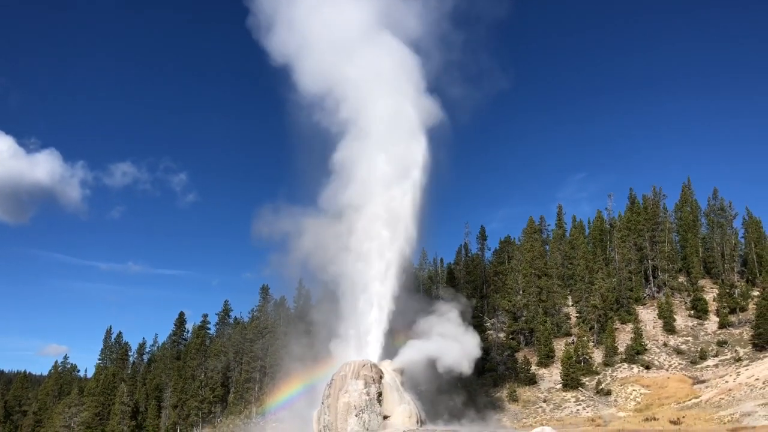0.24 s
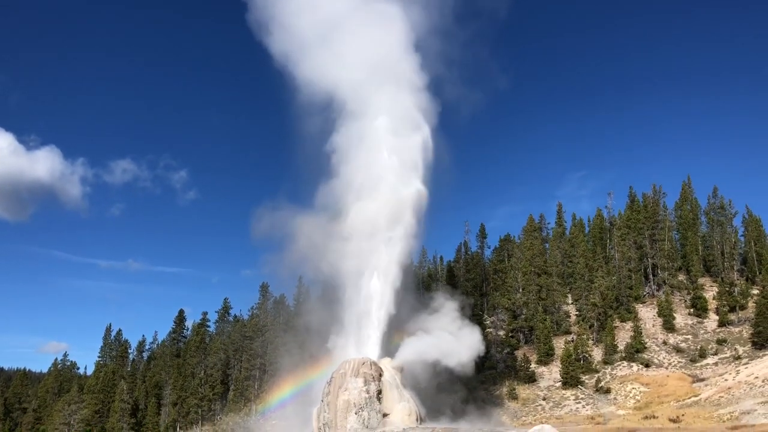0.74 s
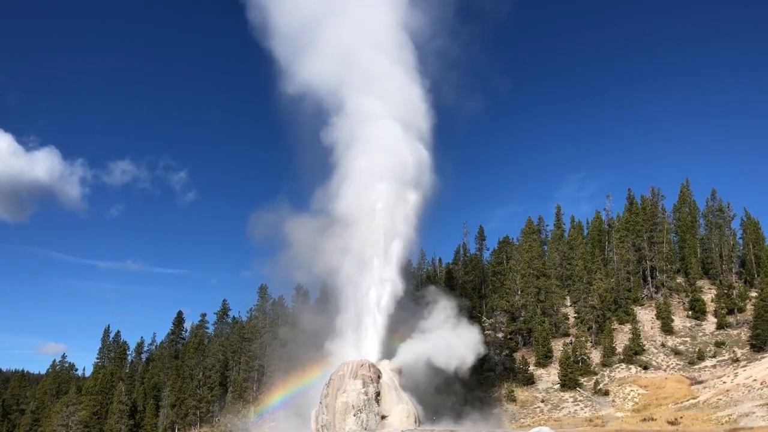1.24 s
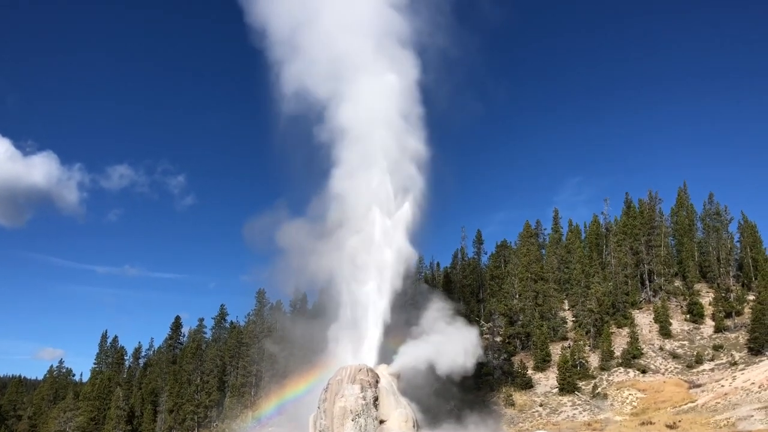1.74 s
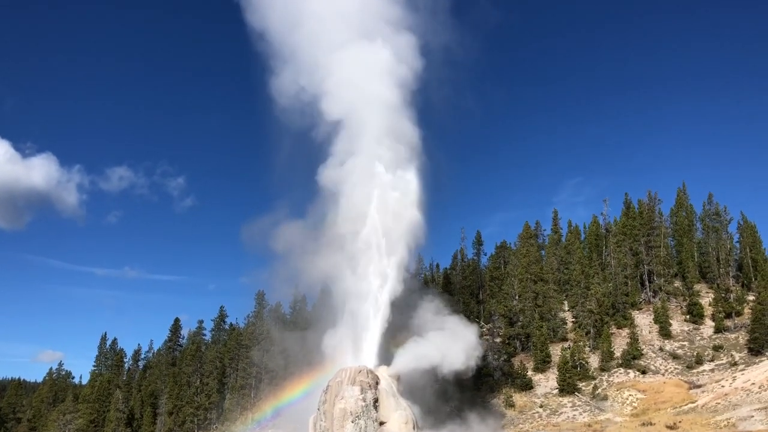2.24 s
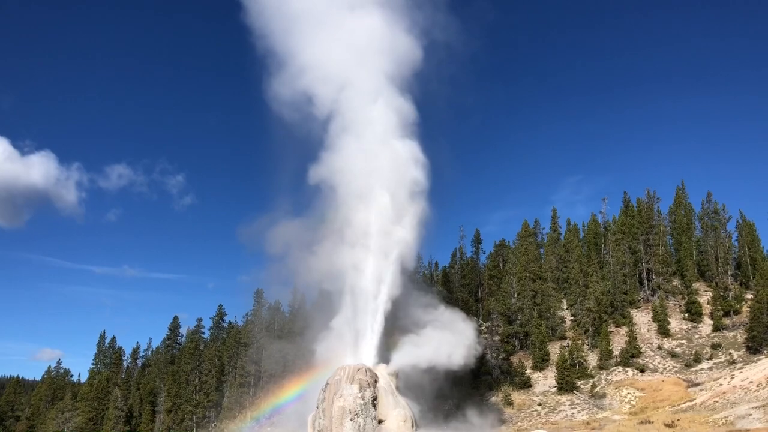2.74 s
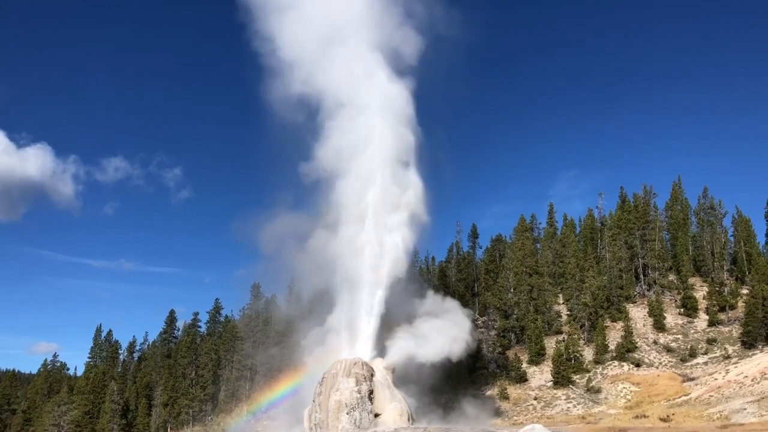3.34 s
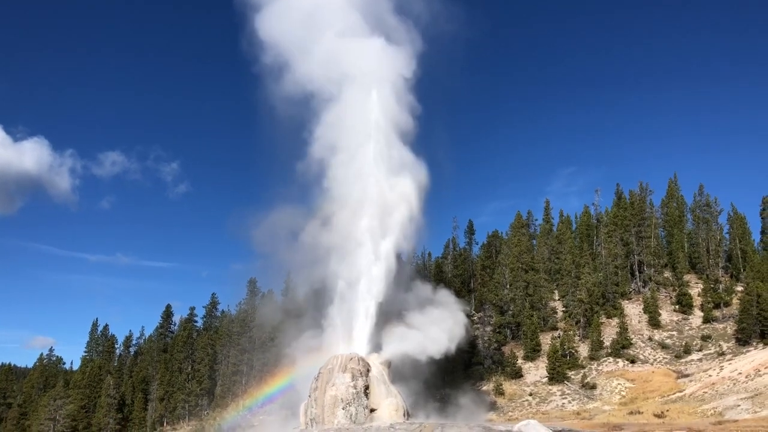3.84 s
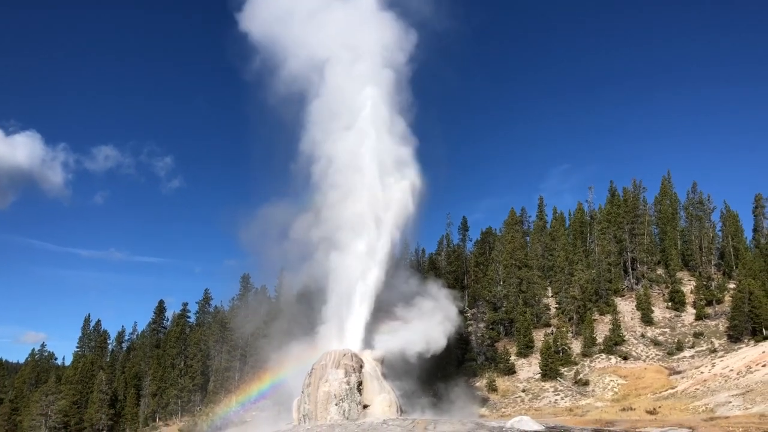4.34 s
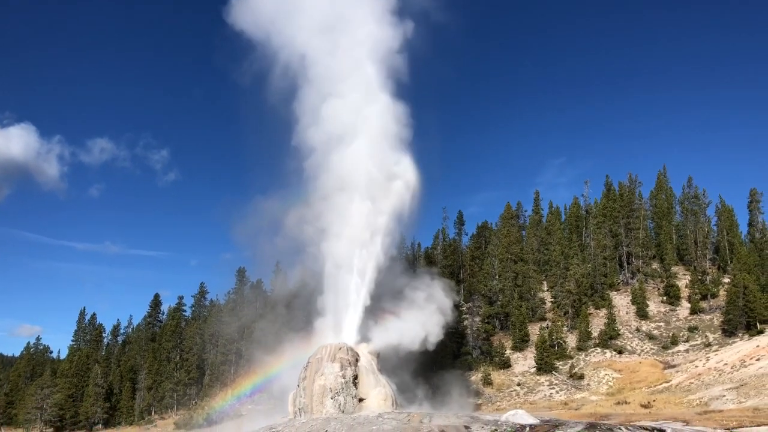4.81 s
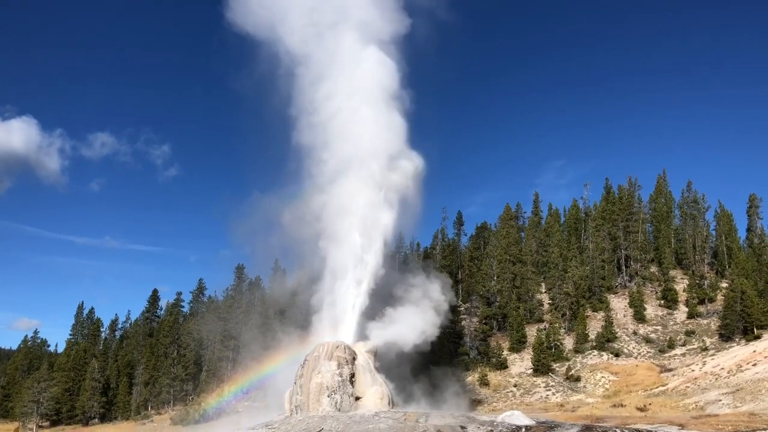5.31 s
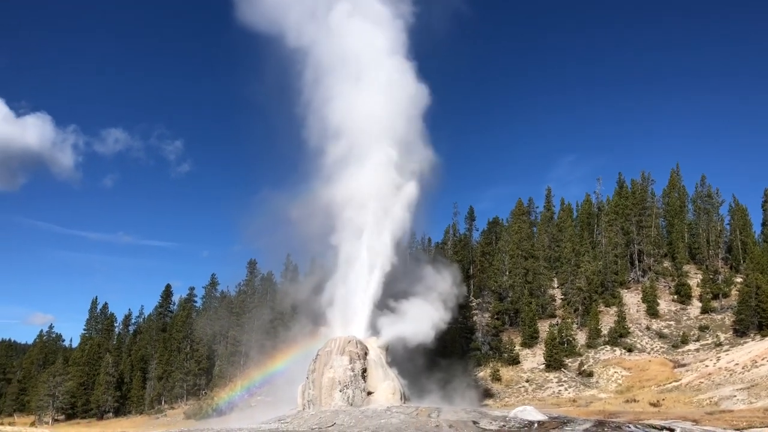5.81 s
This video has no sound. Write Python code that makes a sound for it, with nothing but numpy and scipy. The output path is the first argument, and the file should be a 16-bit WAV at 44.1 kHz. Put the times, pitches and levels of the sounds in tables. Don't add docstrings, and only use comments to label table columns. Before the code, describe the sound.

Steady outdoor rush of water and steam from a stone cone, already going at the start and never stopping. Low turbulent roar dominates, with fine grainy spray hissing above it. Short thumps and surges alternate with tiny sags. Two barely audible bird notes, one rising and one falling, pass just before one second. The flow weakens around the middle and strengthens toward the end. Single small microphone, open ground, no enclosed echo, slightly comb-coloured.

```python
import sys
import numpy as np
from scipy import signal
from scipy.fft import rfft, irfft, next_fast_len
from scipy.io import wavfile
from scipy.ndimage import uniform_filter1d, map_coordinates

SR = 44100
rng = np.random.default_rng(int(sys.argv[2]) if len(sys.argv) > 2 else 0)


def volts_from_decibels(level):
    exponent = np.asarray(level, float) / 20
    return 10 ** exponent


def transcribe(signal):
    frames = np.atleast_2d(signal).T
    limited = np.clip(frames, -1, 1)
    pcm = np.round(limited * 32767).astype(np.int16)
    wavfile.write(sys.argv[1], SR, pcm)


N = 267687


def walk(rate_hz):
    hold = int(SR / rate_hz)
    levels = np.repeat(rng.standard_normal(N // hold + 1), hold)
    smooth = uniform_filter1d(uniform_filter1d(levels, hold), hold)[:N]
    return smooth / smooth.std()


def bump(x, middle, width):
    return 2 ** (-(2 * (x - middle) / width) ** 2)


def strength(octave):
    # (time [s], level [dB])
    flow = [(0.0, -54), (0.67, -54.5), (0.91, -60), (1.0, -58), (1.17, -58), (1.18, -59), (1.81, -56.5),
            (2.03, -57), (2.38, -55), (2.59, -56.5), (3.14, -57.5), (3.38, -59.5), (3.6, -58.5),
            (4.09, -55.5), (4.28, -53), (5.0, -55.5), (5.24, -53), (6.07, -55.5)]
    # (time [s], length [s], sag
    # [dB])
    chokes = [(0.34, .1, 2), (1.487, 0.069, 0.5), (2.63, 0.076, 1.5), (3.197, .05, 1), (3.9, .06, -0.5),
              (4.107, .06, 1), (4.624, 0.092, 1.5), (5.11, 0.046, 2), (4.98, .08, 0.3), (5.604, .07, 2),
              (5.926, .1, 1.5)]
    # (time [s], length [s], swell [dB], pitch of the eddies shed [Hz])
    slugs = [(0.117, 0.1, 4, 496), (0.253, .1, 6, 594), (.05, .06, 3, 200), (0.447, 0.037, 4.5, 120),
             (0.504, 0.13, 1.5, 600), (0.532, 0.057, 6.5, 150), (0.613, .06, 1.5, 150),
             (1.66, .08, 1.5, 90), (1.73, 0.046, 2, 1500), (1.864, 0.17, 3.5, 250),
             (2.296, 0.069, 4.5, 200), (2.374, 0.056, 3.1, 400), (2.577, 0.042, 4, 130),
             (3.62, 0.23, 2, 1100), (4.38, 0.22, 3.5, 130), (4.44, 0.06, 3, 900), (4.82, .07, 4, 150),
             (5.065, 0.092, 3.5, 130), (5.262, 0.091, 4.5, 300), (5.42, 0.055, 2, 130),
             (5.825, 0.047, 1, 150), (6.02, 0.045, 2, 200)]
    eddy_hz = (130, 900, 3300, 10000)
    follows = (0.6, 0.62, 0.51, 1.2)

    t = np.arange(0, N + 200, 100) / SR
    flow_s, flow_db = np.transpose(flow)
    force = np.interp(t, flow_s, flow_db)
    for at, length, sag_db in chokes:
        force = force - sag_db * bump(t, at, length)
    level = np.interp(octave, np.log2(eddy_hz), follows) * (force - force.mean())
    for at, length, swell_db, hz in slugs:
        nearness = bump(octave, np.log2(hz), 2 * 1.78)
        level = level + swell_db * bump(t, at, length) * nearness
    return np.interp(np.arange(N) / SR, t, level)


def jet(surge_db, sputter_db, flicker_db, spit_db):
    # (frequency [Hz], density [dB per Hz])
    colour = [(40, -2), (70, 2), (140, -1.5), (260, -6), (360, -9.5), (700, -17), (1500, -22.5),
              (3000, -26), (4300, -25.5), (5300, -31.5), (8800, -34.5), (11000, -39.5), (13400, -48.5),
              (16000, -50.5)]

    size = next_fast_len(N)
    octave = np.log2(np.maximum(np.fft.rfftfreq(size, 1 / SR), 1))
    colour_hz, colour_db = np.transpose(colour)
    gain = volts_from_decibels(np.interp(octave, np.log2(colour_hz), colour_db))

    surge, sputter = walk(20), walk(45)
    surge = surge - uniform_filter1d(surge, SR // 8)

    spit = np.minimum(rng.exponential(size=size), 5)
    drops = rng.standard_normal(size) * volts_from_decibels(spit_db * spit)
    spray = rfft(drops / drops.std())
    eddies = rfft(rng.standard_normal(size))
    spray_share = np.clip((octave - 12) / 2, 0, 1)
    spectrum = gain * (np.sqrt(1 - spray_share) * eddies + np.sqrt(spray_share) * spray)

    out = 0
    for centre in np.arange(4, 14.6, 0.5):
        window = np.cos(np.pi * np.clip(octave - centre, -0.5, 0.5)) ** 2
        band = irfft(spectrum * window, size)[:N]
        fineness = np.clip((centre - 8) / 5, 0, 1)
        unrest = fineness * (surge_db * surge + sputter_db * sputter)
        out = out + band * volts_from_decibels(strength(centre) + unrest + flicker_db * walk(13))
    return out


def bounced(direct):
    # (lag at start [ms], lag at end [ms], share at start [ratio], share at end [ratio], dull above [Hz])
    reflections = [(1.2, 1.137, 0.85, 0.54, 542), (1.42, 1.6, -0.26, -0.028, 1120),
                   (2.07, 2.37, -0.8, -0.66, 300), (2.66, 2.95, 0.045, 0.13, 1110),
                   (3.31, 3.495, -0.4, -0.32, 394)]

    out = direct
    for lag0, lag1, share0, share1, dull_hz in reflections:
        pole = np.exp(-2 * np.pi * dull_hz / SR)
        dull = signal.lfilter([1 - pole], [1, -pole], direct)
        lag_ms = np.linspace(lag0, lag1, N) * (1 + 0.015 * walk(3.05))
        late = map_coordinates(dull, [np.arange(N) - lag_ms * SR / 1000], order=3, mode="mirror")
        out = out + np.linspace(share0, share1, N) * late
    return out


def bird():
    # (time [s], length [s], start pitch [Hz], end pitch [Hz], level [dB])
    whistles = [
        (.78, .08, 650, 935, -50.5),
        (.88, .105, 1400, 860, -55.5),
    ]

    out = np.zeros(N)
    for start, length, hz0, hz1, level_db in whistles:
        n, at = int(length * SR), int(start * SR)
        pitch = hz0 + (hz1 - hz0) * np.linspace(0, 1, n) ** 1.25
        tone = np.sqrt(2) * np.sin(2 * np.pi * np.cumsum(pitch) / SR)
        out[at:at + n] += volts_from_decibels(level_db) * signal.windows.tukey(n, 0.5) * tone
    return out


def scene():
    rush = bounced(jet(surge_db=0.26, sputter_db=0.64, flicker_db=0.2, spit_db=1.2))
    jet_db = -30.5
    return (rush * volts_from_decibels(jet_db) / rush.std() + bird())[None]


def low_pass(x):
    return signal.sosfilt(signal.butter(12, 15700, fs=SR, output="sos"), x)


def record(dry):
    low_cut_hz, hiss_db, drive = 52, -76, 2.5
    low_cut = signal.butter(4, low_cut_hz, "high", fs=SR, output="sos")
    heard = signal.sosfilt(low_cut, dry)
    heard = heard + volts_from_decibels(hiss_db) * rng.standard_normal(dry.shape)
    return low_pass(np.tanh(drive * heard) / drive)


dry = scene()
out = record(dry)
transcribe(out)
```